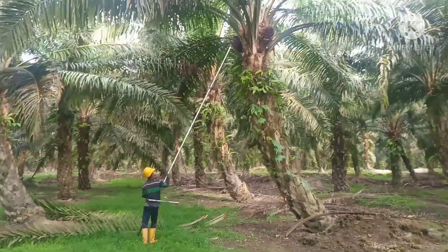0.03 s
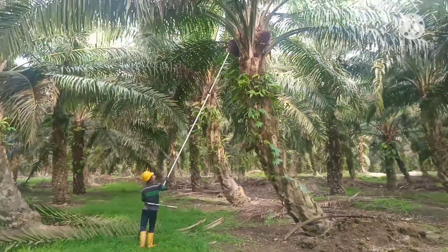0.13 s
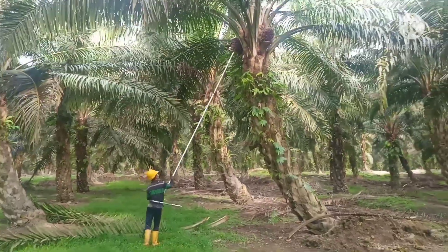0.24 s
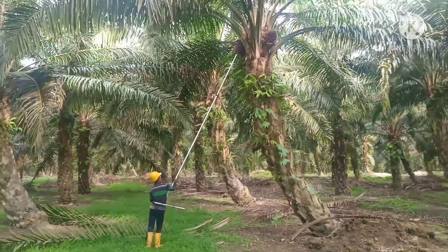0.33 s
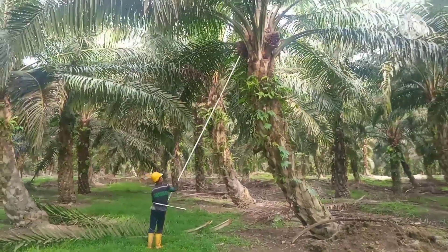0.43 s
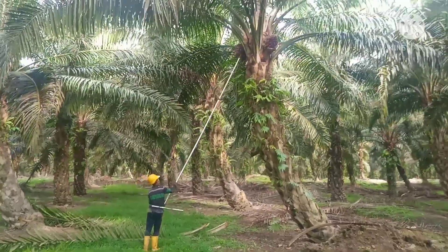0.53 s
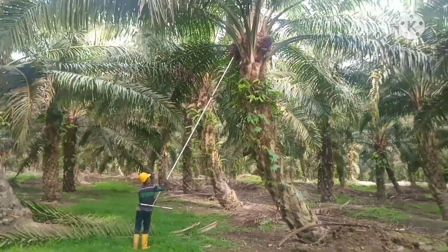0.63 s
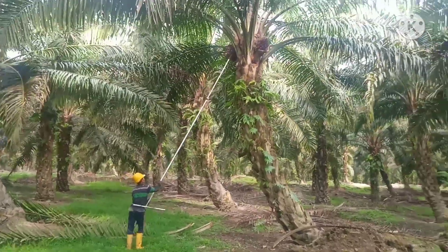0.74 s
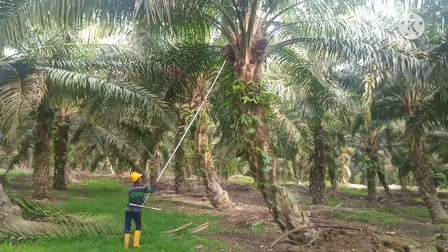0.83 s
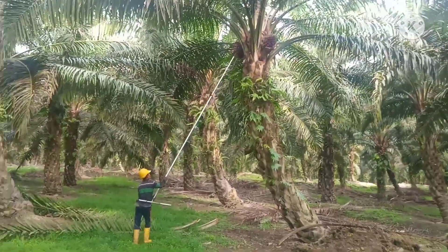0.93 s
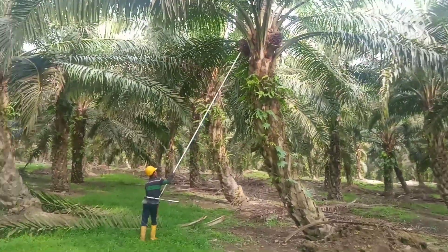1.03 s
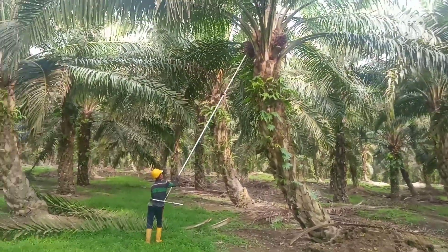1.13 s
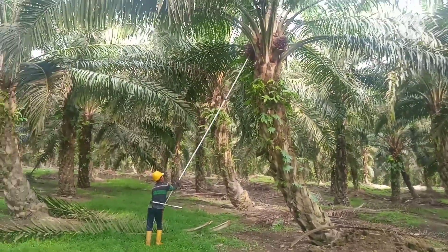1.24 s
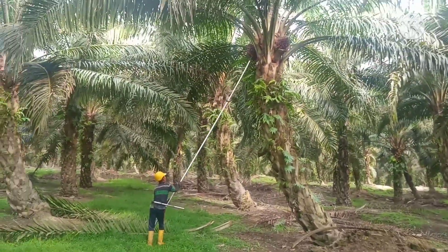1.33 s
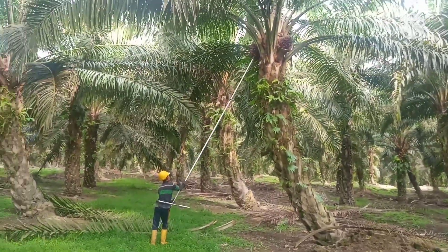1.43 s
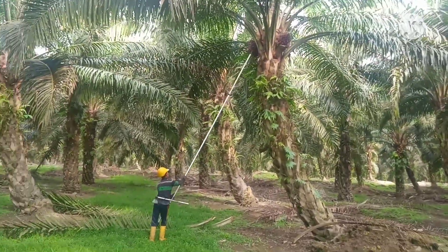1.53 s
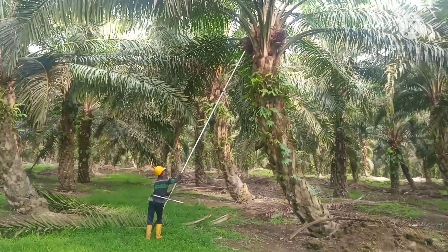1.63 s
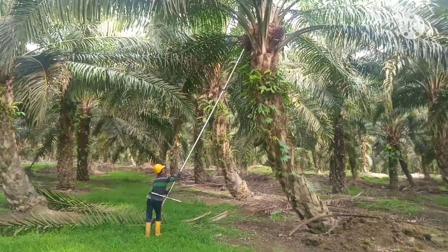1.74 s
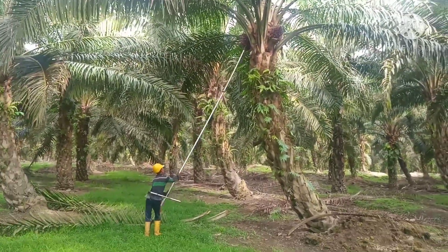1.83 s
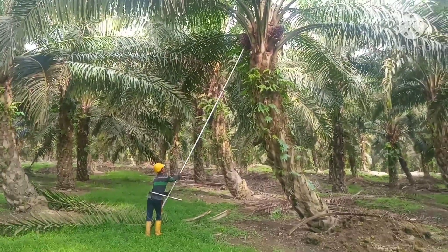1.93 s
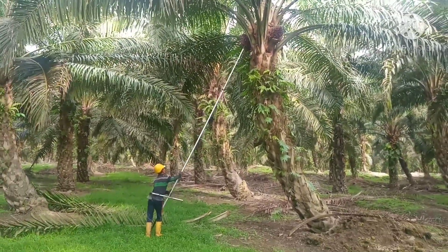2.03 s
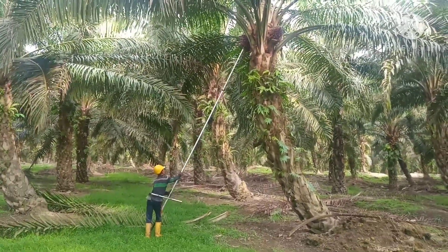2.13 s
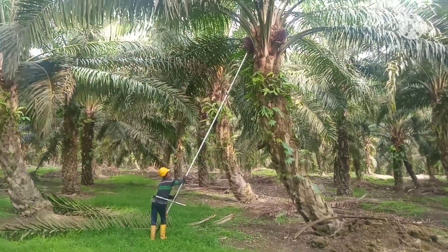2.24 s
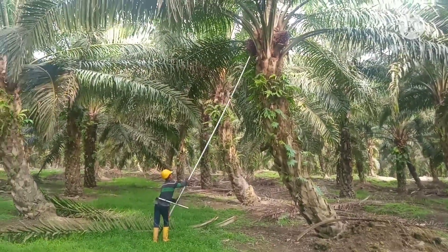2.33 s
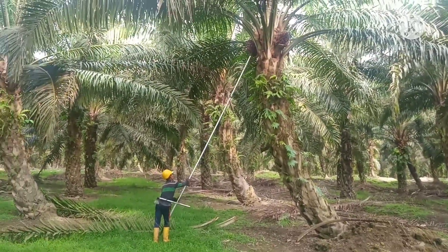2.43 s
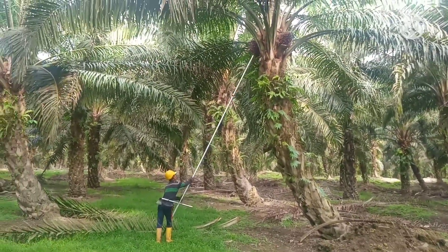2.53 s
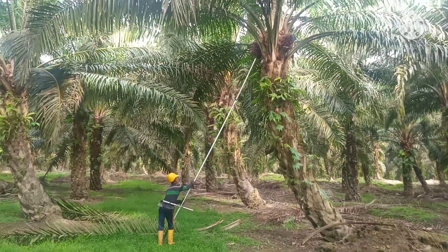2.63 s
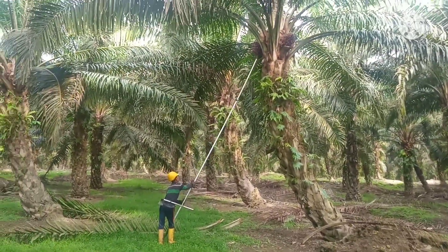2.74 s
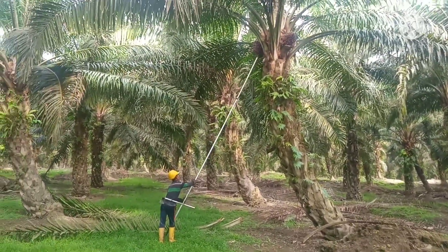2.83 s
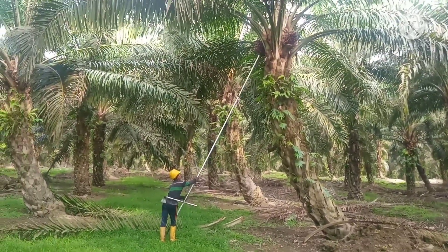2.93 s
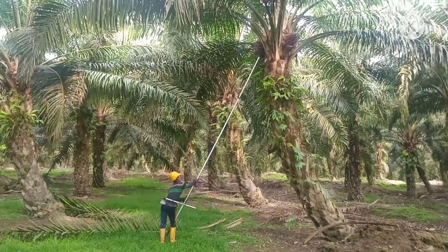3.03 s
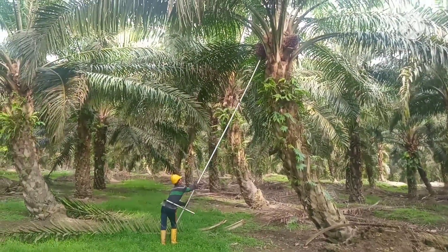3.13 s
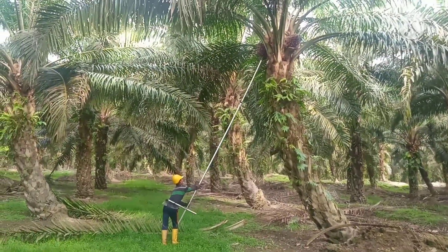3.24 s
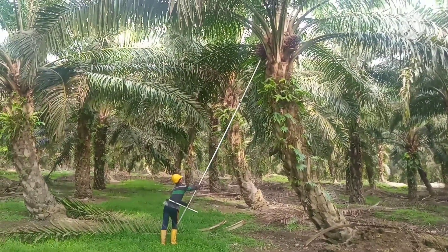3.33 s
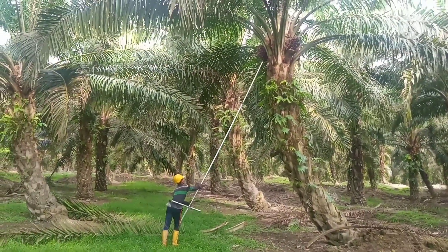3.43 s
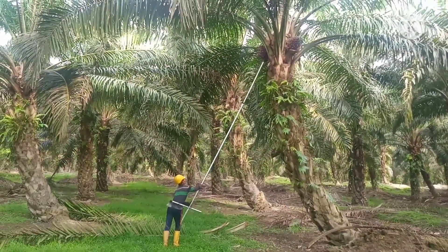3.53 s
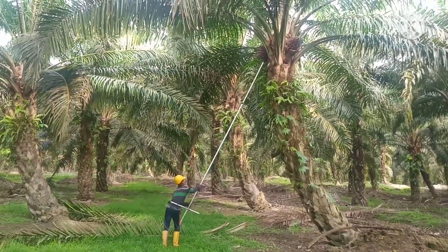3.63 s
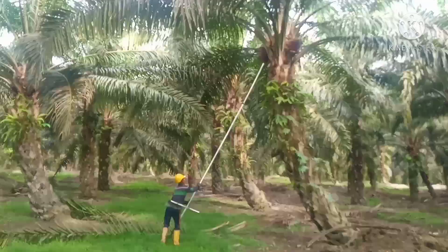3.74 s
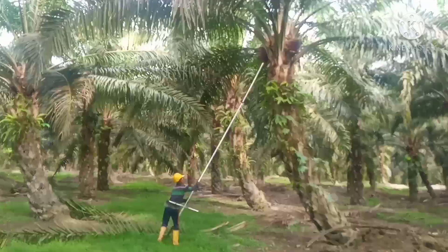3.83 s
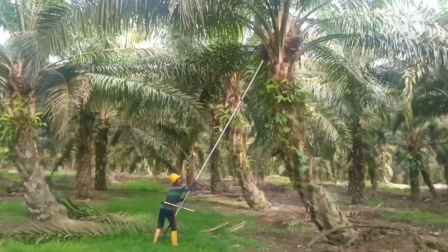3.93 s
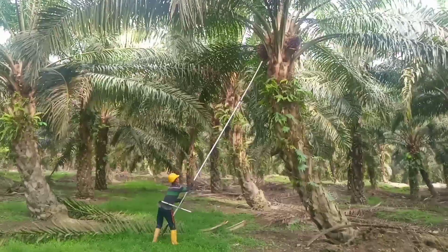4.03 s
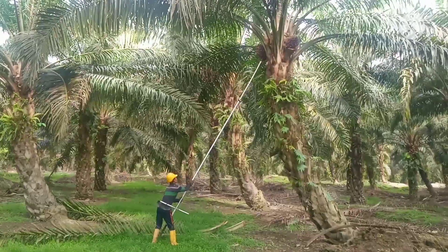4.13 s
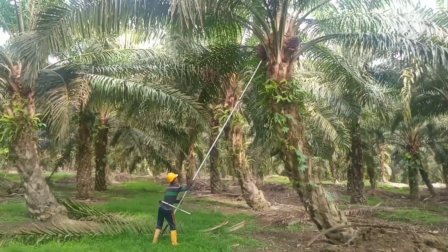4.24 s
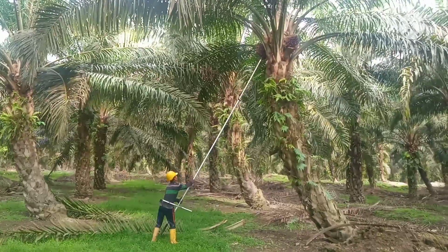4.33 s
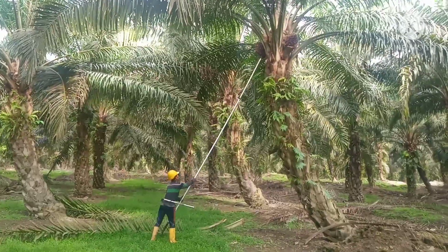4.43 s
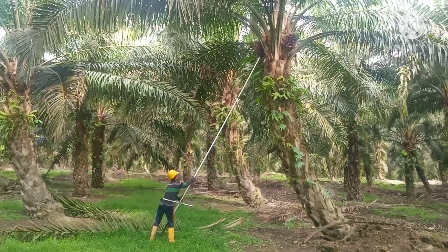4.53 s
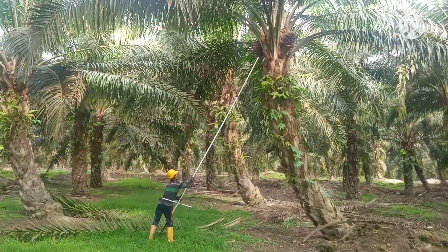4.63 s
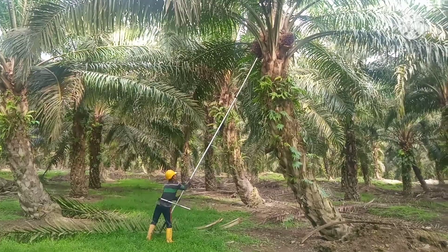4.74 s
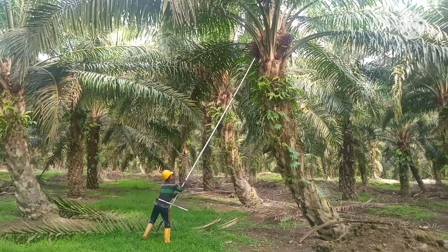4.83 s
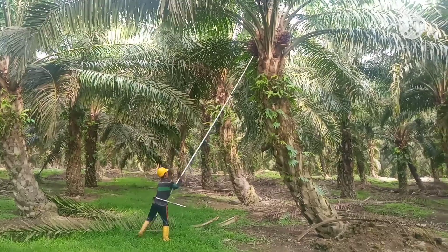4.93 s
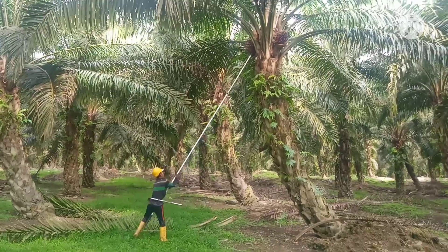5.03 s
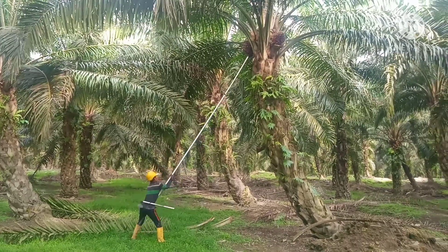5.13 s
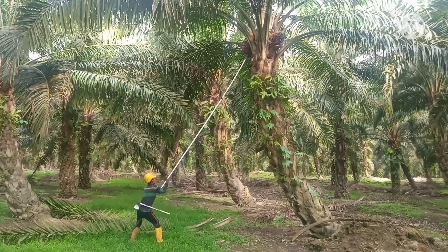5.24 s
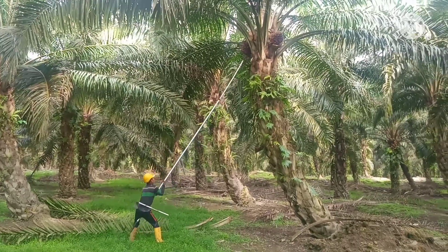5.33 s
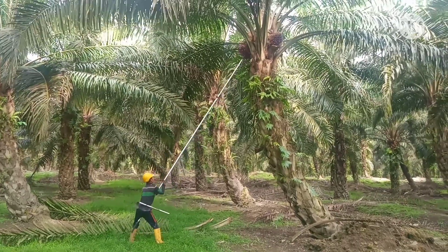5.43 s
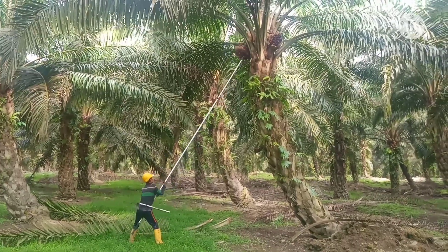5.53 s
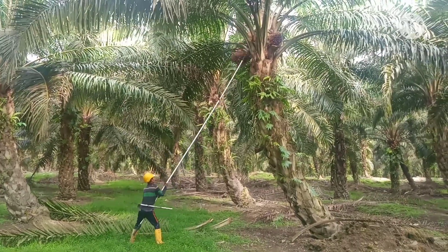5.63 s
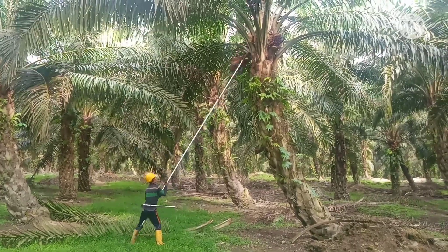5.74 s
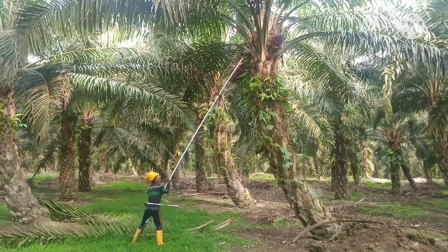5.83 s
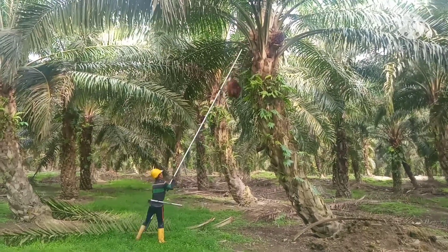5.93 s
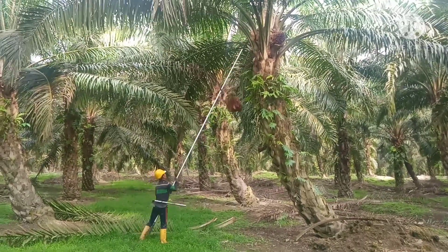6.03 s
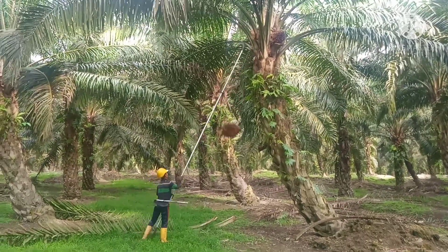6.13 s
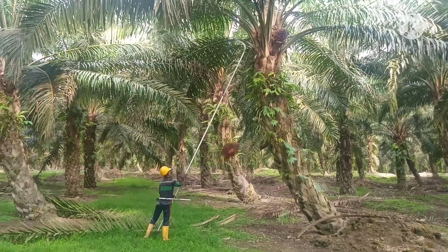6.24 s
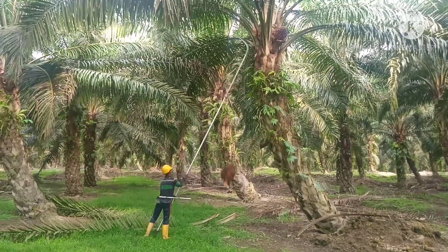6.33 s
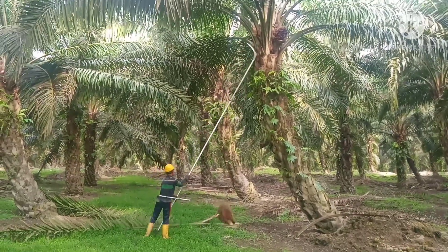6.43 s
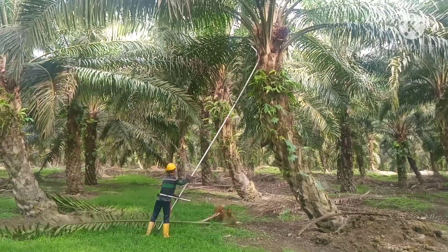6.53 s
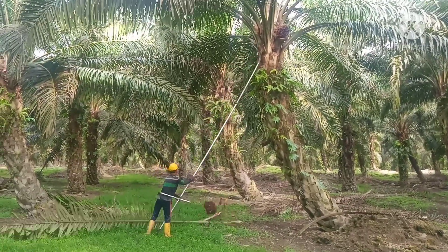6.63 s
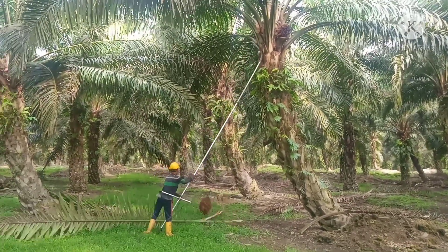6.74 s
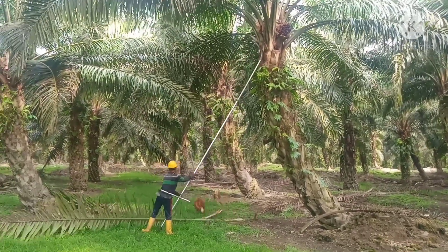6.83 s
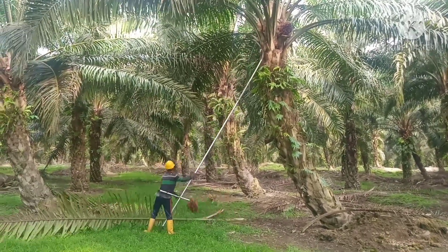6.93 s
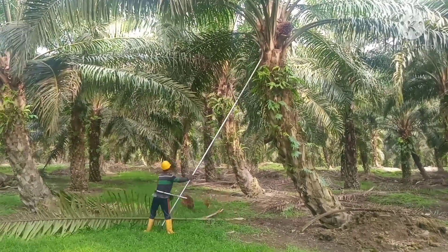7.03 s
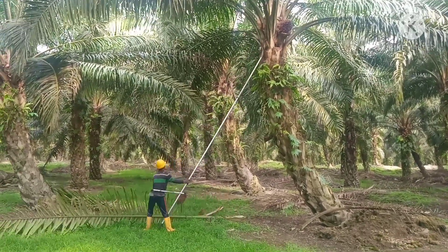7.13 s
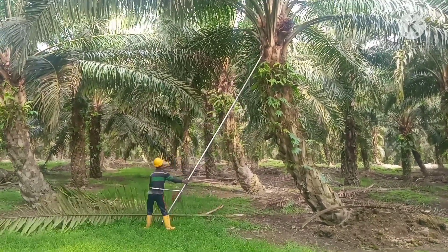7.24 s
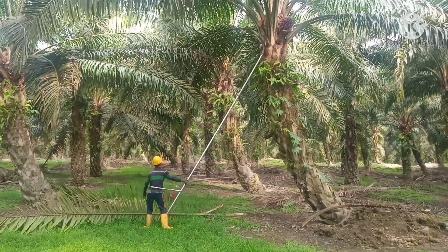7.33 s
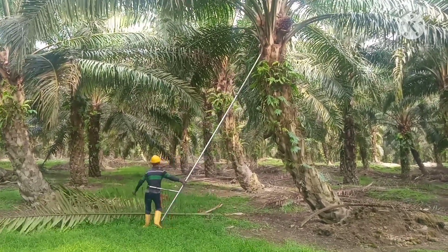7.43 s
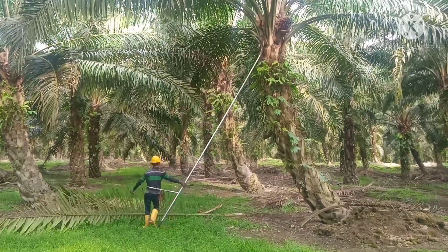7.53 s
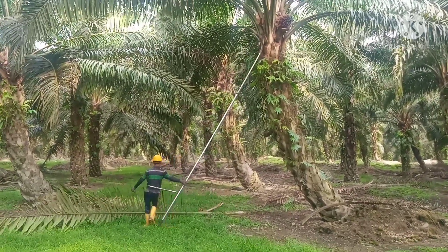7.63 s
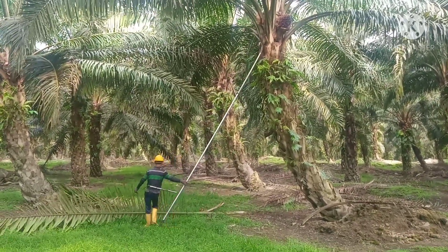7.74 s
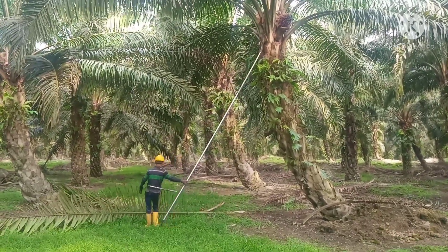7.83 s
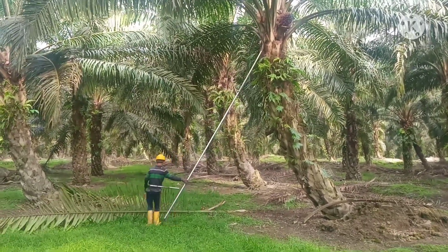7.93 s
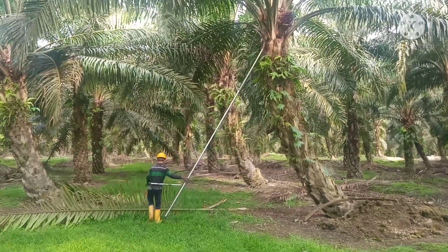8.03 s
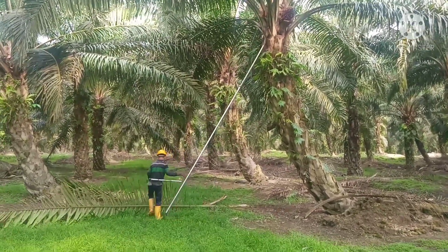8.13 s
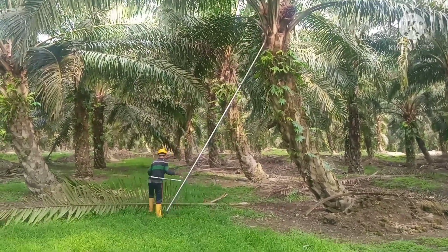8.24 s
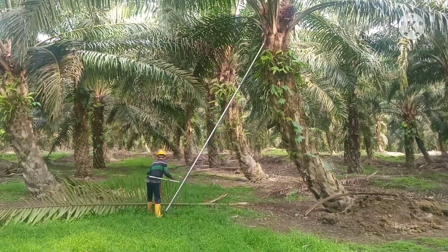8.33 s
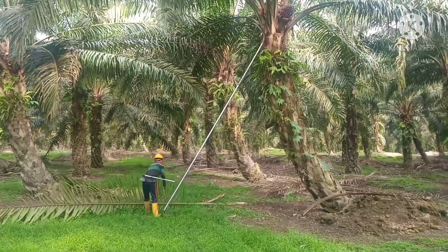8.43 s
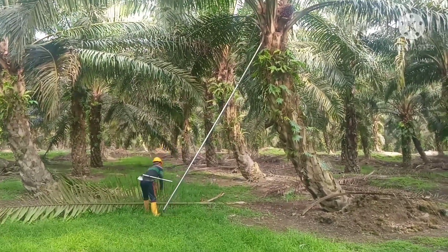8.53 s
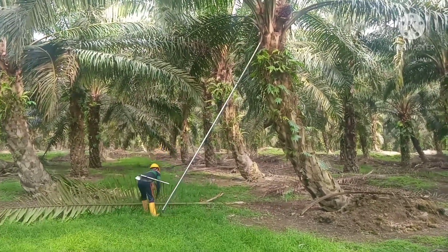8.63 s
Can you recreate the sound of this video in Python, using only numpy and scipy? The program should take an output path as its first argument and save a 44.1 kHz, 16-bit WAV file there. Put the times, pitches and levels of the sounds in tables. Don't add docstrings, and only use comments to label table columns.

```python
import sys
import numpy as np
from scipy import signal
from scipy.fft import rfft
from scipy.io import wavfile
from scipy.ndimage import uniform_filter1d

SR = 44100
rng = np.random.default_rng(int(sys.argv[2]) if len(sys.argv) > 2 else 0)


def convert_level_to_amplitude(level_db):
    exponent = np.asarray(level_db, float) / 20
    return 10 ** exponent


def output_pcm(signal):
    pcm = np.clip(np.atleast_2d(signal).T, -1, 1) * 32767
    wavfile.write(sys.argv[1], SR, np.round(pcm).astype(np.int16))


N = 383669
TIME = np.arange(N) / SR


def level(x, db):
    return x * convert_level_to_amplitude(db) / np.sqrt(np.mean(x ** 2))


def band(x, hz, width):
    return signal.lfilter(*signal.iirpeak(hz, hz / width, SR), x)


def dull(x, low_hz, high_hz):
    return signal.sosfilt(signal.butter(2, [low_hz, high_hz], "band", fs=SR, output="sos"), x)


def modes(x, table):
    return sum((-1) ** k * convert_level_to_amplitude(db) * band(x, hz, width) for k, (hz, width, db) in enumerate(table))


def walk(rate):
    hold = int(SR / rate)
    steps = np.repeat(rng.standard_normal(N // hold + 1), hold)
    return 1.37 * uniform_filter1d(uniform_filter1d(steps, hold), hold)[:N]


def patchy(x, table, patchy_db):
    return sum(convert_level_to_amplitude(patchy_db * walk(35)) * modes(x, [mode]) * (-1) ** k for k, mode in enumerate(table))


def add(out, s, sound):
    i = int(s * SR)
    out[i:i + len(sound)] += sound[:N - i]


def swell(s, build, fade, db):
    onset_db, fade_db = -14, -22
    fades = np.clip((TIME - s - build) / fade, 0, 4)
    rise = np.clip(1 - (TIME - s) / build, 0, 1)
    return (TIME >= s) * convert_level_to_amplitude(db + onset_db * rise + fade_db * fades), fades


# centre in Hz, width in Hz, time to fade by 60 dB in seconds, level in dB.
GROVE_ECHOES = [
    (306, 260, 0.082, 11.5),
    (1300, 2200, 0.34, -2),
    (3150, 2550, 0.96, 3),
    (4450, 2800, 0.54, -6),
    (8300, 4000, 0.92, 5.5),
]


def grove(x, wet_db):
    t = TIME[:SR]
    leaves = 0.69 * np.exp(-t / 0.038) + 1.0 * np.exp(-t / 0.31)
    trunks = 0.32 * np.exp(-((t - .1) / 0.093) ** 2)
    scatter = rng.standard_normal(SR) * convert_level_to_amplitude(1.0 * walk(75.7)[:SR])
    scatter = scatter * (1 + leaves + trunks) * np.clip(t / 0.0028, 0, 1)
    tail = sum(convert_level_to_amplitude(db - 60 * t / t60) * band(scatter, hz, width) for hz, width, t60, db in GROVE_ECHOES)
    middle = np.sqrt(np.mean(np.abs(rfft(tail)[2000:4000]) ** 2))
    return x + convert_level_to_amplitude(wet_db) * signal.fftconvolve(x, tail / middle)[:N]


def bursts(hits, decay_s):
    out, t = np.zeros(N), TIME[:1300]
    for s, db in hits:
        add(out, s, convert_level_to_amplitude(db) * rng.standard_normal(len(t)) * np.exp(-t / decay_s) * np.clip(t / 0.0006, 0, 1))
    return out


def rings(hits, length, attack_s):
    out, t = np.zeros(N), TIME[:length]
    for s, db, hz, ring in hits:
        add(out, s, convert_level_to_amplitude(db - 60 * t / ring) * np.clip(t / attack_s, 0, 1) * np.sin(2 * np.pi * hz * t))
    return out


def crackle(strokes, body, middle, top_db, spread_db, clump_db, lingers_db):
    force, boom = np.zeros((2, N))
    for *stroke, body_db in strokes:
        gain, fades = swell(*stroke)
        force += gain
        boom += gain * convert_level_to_amplitude(body_db + lingers_db * fades)
    force, boom = uniform_filter1d(np.array([force, boom]), size=400) * convert_level_to_amplitude(clump_db * walk(140))

    def grains():
        sizes = np.minimum(rng.exponential(size=N), 4.5)
        return rng.standard_normal(N) * convert_level_to_amplitude(spread_db * sizes + 1.2 * walk(60))

    low, mid, high = grains(), grains(), grains()
    low = dull(patchy(low, body, patchy_db=3.0), 110, 1200)
    mid = dull(patchy(mid, middle, patchy_db=1.5), 500, 4300)
    fibres = band(high, 3800, 2800) + convert_level_to_amplitude(6.5) * band(high, 6100, 1700) + convert_level_to_amplitude(-26.0) * high
    top = dull(fibres, 3700, 14000)
    return boom * level(low, -3.5) + force * (level(mid, 1.84) + level(top, top_db))


# pitch in Hz, level in dB per Hz.
AIR_TONE = [(65, -37), (110, 0.5), (188, -1.5), (531, -23), (754, -9), (947, -21.5), (1800, -4), (2120, 0),
            (2960, 0.5), (3420, -2.5), (5620, -48), (8500, -49), (10200, -32.5), (15500, -43.5)]
# centre in Hz, width in Hz, level in dB.
INSECTS = [
    (8520, 1000, -78.5),
    (7170, 320, -87),
]


def air():
    out, (hz_at, db_at) = 0, np.transpose(AIR_TONE)
    slow = walk(0.29)
    for hz in 120 * 2 ** np.arange(0, 7.1, .4):
        flicker = (0.5 * slow + 5.3 * walk(7.7)) * (100 / hz) ** 0.7
        db = np.interp(np.log(hz), np.log(hz_at), db_at) + flicker
        noise = rng.standard_normal(N)
        for _ in range(3):
            noise = band(noise, hz, hz / 2)
        out = out + convert_level_to_amplitude(db) * noise
    insects = sum(level(band(band(rng.standard_normal(N), hz, w), hz, w), db) for hz, w, db in INSECTS)
    return level(out, -63) + insects * convert_level_to_amplitude(0.57 * walk(4.7)) + convert_level_to_amplitude(-92.5) * rng.standard_normal(N)


# start in seconds, build-up in seconds, fade in seconds, peak in dB.
PUFFS = [(.001, .011, 0.47, -66), (0.612, 0.065, 0.35, -63.5), (1.0, 0.45, 0.064, -63.5),
         (2.101, 0.47, 0.5, -69.5), (3.2, 0.35, 0.087, -84), (3.8, 0.18, 0.064, -67),
         (4.19, 0.057, 0.28, -62), (4.55, 0.25, 0.99, -68.5), (5.12, 0.12, 0.14, -58),
         (5.6, 0.54, 0.5, -70), (6.34, 0.032, 0.37, -45.5), (6.801, 0.11, 0.2, -58),
         (7.67, 0.04, 0.26, -60), (8.17, 0.12, 0.76, -69)]


def breeze():
    rumble = dull(dull(rng.standard_normal(N), 61.4, 150), 28, 170) * convert_level_to_amplitude(2.5 * walk(13))
    calm_db = -74.5
    return level(rumble, -1.4) * (convert_level_to_amplitude(calm_db) + sum(swell(*puff)[0] for puff in PUFFS))


# start in seconds, build-up in seconds, fade in seconds, peak in dB, stalk body in dB.
STROKES = [(0.001, 0.0014, 0.07, -46, -12), (.228, 0.012, 0.052, -46, -25.5),
           (.695, 0.0097, 0.088, -48, -21.5), (.94, 0.0053, 0.11, -52, -0.5),
           (1.145, 0.053, 0.11, -45, -7.5), (1.474, 0.0032, 0.094, -44, -1.5),
           (1.678, 0.065, 0.078, -44, -7), (1.934, 0.036, 0.18, -52.5, -5.5),
           (2.155, 0.081, 0.055, -45, -11), (2.375, 0.0056, 0.15, -51.5, 0), (2.57, 0.051, 0.059, -46, -16),
           (2.635, .02, .055, -50, 1), (2.812, 0.014, 0.053, -58, -0.5), (3.004, 0.019, 0.056, -43, -15.5),
           (3.284, 0.007, 0.085, -58.5, -4), (3.57, 0.027, 0.11, -54, -1.5),
           (3.9, 0.056, 0.068, -41.5, 0.5), (4.095, 0.023, 0.054, -54.5, -1), (4.362, 0.01, 0.074, -37, -6),
           (5.083, 0.12, 0.073, -32, 0.8), (5.225, 0.024, 0.034, -37.5, 5.5),
           (5.731, 0.0036, 0.044, -41.5, -1), (6.002, 0.0046, 0.014, -55, -32),
           (0.042, 0.078, 0.19, -47.5, -7.5), (0.31, 0.024, 1, -54, -17), (2.7, 0.029, 0.15, -49.5, -6.5),
           (4.6, 0.0085, 0.36, -60.5, -18.5), (4.75, 0.02, 0.1, -62, -19), (4.8, 0.063, 0.4, -62, -4.5),
           (5.26, 0.012, 0.38, -60, -10), (5.602, 0.0025, 0.91, -50, -20.5),
           (7.385, 0.015, 0.052, -57.5, -16), (5.5, 0.011, 0.12, -53.5, -6), (1.95, .004, 0.076, -50, -3.5),
           (2.186, .003, 0.059, -48, -15), (3.03, 0.034, 0.069, -50.5, 2.5),
           (3.33, 0.015, 0.099, -67.5, 1.5), (1.934, 0.0028, 0.02, -53.5, -7), (2, 0.02, 0.04, -66, -4)]
# pitch in Hz, width in Hz, level in dB.
STALK = [(224, 79, 2), (306, 161, 2), (374, 47, -1), (443, 72, -5)]
# pitch in Hz, width in Hz, level in dB.
BLADE = [(806, 152, -6), (1034, 170, -3.5), (1385, 268, -4.5), (2080, 322, -1), (3240, 1360, -7)]


def sawing():
    return crackle(STROKES, STALK, BLADE, top_db=-27.5, spread_db=4.0, clump_db=2.0, lingers_db=6.5)


# start in seconds, middle range in dB.
TAPS = [(.0094, -52), (.0444, -51), (.2344, -33), (.3248, -27.5), (.7047, -37), (0.9464, -30.5),
        (1.5279, -51), (1.7483, -51), (2.0368, -29.5), (2.146, -29.5), (2.2194, -46), (2.655, -43),
        (3.0106, -39.5), (3.028, -40), (4.1073, -34), (4.6545, -51), (5.0895, -40), (5.7305, -55.5),
        (6.011, -39), (6.3107, -33), (6.3485, -26.5), (6.3735, -30.5), (6.7994, -35.5), (6.8944, -37),
        (6.9685, -40), (7.3694, -52), (8.1397, -53)]


def taps():
    ring = modes(bursts(TAPS, decay_s=.0055), BLADE)
    return convert_level_to_amplitude(5.0) * dull(dull(ring, 600, 2300), 450, 2600)


# start in seconds, peak in dB, pitch in Hz, ring in seconds.
CLINKS = [(5.925, -62.5, 1200, .08), (6.006, -36, 1350, .04), (7.35, -47.5, 706, 0.077),
          (7.005, -52.5, 680, .06), (5.5, -56, 730, .06), (6.2, -46.5, 990, 0.07),
          (3.285, -48.5, 1200, 0.072), (1.432, -50, 1350, 0.04), (.236, -47, 800, .07),
          (.322, -45, 800, .05), (.055, -48, 800, .05), (2.6, -45, 252, 0.13), (5.74, -33.5, 288, 0.07),
          (6.795, -48, 820, .06), (6.932, -44, 806, 0.048), (6.968, -43, 1000, 0.045)]


def clinks():
    return grove(rings(CLINKS, SR // 4, attack_s=.004), -1.0)


# start in seconds, middle range in dB, treble in dB.
SNAPS = [(0.1249, -23.5, -30), (0.7669, -32, -37), (1.1532, -33, -49), (1.197, -53, -40.5),
         (1.4352, -37.5, -47), (1.475, -52, -44), (1.68, -31, -46), (1.6871, -35, -40), (1.937, -44, -46),
         (1.9756, -39, -38), (2.184, -55, -34), (2.201, -20.5, -39), (2.299, -49, -43), (2.383, -20.5, -42),
         (2.592, -34, -42.5), (2.823, -45, -43), (3.0779, -31.5, -36.5), (3.576, -47, -52),
         (3.9075, -49, -44), (3.931, -39, -57), (4.282, -32, -48), (4.368, -27, -35.5), (4.97, -47, -59),
         (5.2061, -8.5, -24.5), (5.6086, -29, -42), (6.394, -12.5, -18.5), (6.416, -14.5, -17),
         (8.237, -41, -46), (.44, -54, -66.5), (4.4094, -58, -57), (5.6237, -45, -52), (3.605, -52, -51),
         (3.64, -55, -57), (3.682, -53, -55), (4.11, -46, -58), (6.3735, -40, -34), (6.355, -38, -32.5),
         (6.93, -47.5, -49)]


def snaps():
    treble = bursts([(s, db) for s, _, db in SNAPS], decay_s=0.0031)
    middle = bursts([(s, db) for s, db, _ in SNAPS], decay_s=0.0031)
    top = dull(band(treble, 8000, 3300), 3500, 6530) + convert_level_to_amplitude(-29) * dull(treble, 10500, 16000)
    return top + convert_level_to_amplitude(6.0) * dull(modes(middle, BLADE), 380, 3800)


# start in seconds, body in dB.
KNOCKS = [(0.1254, -27), (0.443, -34.5), (0.948, -20.5), (1.435, -45), (1.475, -50), (1.5271, -26.5),
          (2.198, -37), (2.383, -63), (2.823, -44), (3.076, -46), (3.906, -54), (3.931, -28), (4.109, -36),
          (4.367, -42), (4.4108, -29.5), (5.0913, -37), (5.2061, -17), (5.7305, -65), (6.31, -41),
          (6.3479, -19), (6.3723, -28), (6.3934, -22), (6.893, -29)]


def knocks():
    return convert_level_to_amplitude(9.0) * dull(modes(bursts(KNOCKS, decay_s=0.0034), STALK), 130, 1100)


# start in seconds, peak in dB, pitch in Hz, ring in seconds.
CRACKS = [(.126, -41, 1894, 0.046), (0.7042, -38, 1455, 0.038), (1.975, -37, 1300, 0.022),
          (2.222, -39, 2110, 0.045), (2.383, -30, 2100, 0.029), (2.61, -43, 1360, 0.043),
          (1.68, -41, 2150, 0.055), (1.745, -44, 2144, .05), (1.749, -38, 996, .04),
          (3.045, -42, 2160, 0.16), (3.288, -54, 290, 0.12), (8.135, -51, 854, 0.055),
          (8.237, -55, 854, 0.036), (3.015, -37, 2145, 0.049), (3.285, -41, 2225, 0.052),
          (4.652, -46, 1380, 0.041), (5.115, -32, 800, 0.046), (5.136, -32, 900, 0.045),
          (5.167, -30, 873, 0.1), (5.18, -32, 900, 0.045), (5.203, -22, 1950, .025),
          (5.2065, -19.5, 2200, 0.022), (5.203, -24, 900, 0.036), (5.207, -21.5, 252, 0.074),
          (5.222, -25, 303, 0.034), (5.244, -25, 824, 0.037), (5.606, -37, 2145, .05),
          (5.734, -31, 1200, 0.041), (5.736, -31.5, 2115, 0.033), (5.733, -27.5, 3440, 0.022),
          (6.3495, -5.5, 1954, 0.0074), (6.3484, -22.5, 1126, 0.026), (6.356, -24, 1000, 0.03),
          (6.404, -24.5, 541, 0.045), (6.3855, -13, 260, .045), (6.395, -23, 791, 0.032),
          (6.3985, -14, 1500, 0.007), (6.437, -25, 260, 0.06), (6.4, -24, 254, .08),
          (6.856, -47, 1300, 0.028), (6.89, -41, 3300, .04), (6.409, -20.5, 783, 0.035),
          (6.417, -18, 2630, 0.032), (6.426, -22, 850, 0.025), (6.467, -26, 2905, 0.044),
          (6.524, -22, 2700, 0.022), (8.69, -43, 3050, 0.018)]


def cracks():
    return dull(rings(CRACKS, SR // 10, attack_s=0.001) * convert_level_to_amplitude(2.6 * walk(400)), 150, 9000)


def whistle(length, start_hz, top_hz, end_hz, db, turn, loudest=0.55, swell_db=0, onset=2.6, curl=1.5,
            attack=.0021, push_db=0, release=0.00052):
    u = np.arange(int(length * SR)) / (length * SR)
    up = top_hz - (top_hz - start_hz) * np.clip(1 - u / turn, 0, 1) ** onset
    down = (top_hz - end_hz) * np.clip((u - turn) / (1.001 - turn), 0, 1) ** curl
    edges = np.clip(u * length / attack, 0, 1) * np.clip((1 - u) * length / release, 0, 1)
    main_push = swell_db * np.exp(-((u - loudest) / 0.18) ** 2)
    early_push = push_db * np.exp(-((u - .14) / 0.11) ** 2)
    return convert_level_to_amplitude(db + main_push + early_push) * edges * np.sin(2 * np.pi * np.cumsum(up - down) / SR)


def glide(length, start_hz, end_hz, db, turn=.95, **shape):
    return whistle(length, start_hz, end_hz, end_hz, db, turn=turn, **shape)


def voice(x):
    x = x * convert_level_to_amplitude(1.9 * walk(150))
    return 1.034 * x + 0.96 * band(x, 3010, 900)


# start in seconds, start pitch in Hz, end pitch in Hz, level in dB.
FALLS = [(.207, 4540, 4170, -44), (1.12, 4930, 4110, -43), (2.335, 4900, 4745, -45.5),
         (3.747, 4820, 3870, -43), (4.766, 4810, 4580, -42), (5.892, 4790, 4400, -45),
         (7.071, 4450, 3930, -42), (8.02, 4496, 4080, -46), (8.668, 4450, 4500, -55)]
# start in seconds, level in dB.
CHIPS = [(0.806, -46), (2.04, -47.5), (3.368, -44), (4.545, -48.5), (6.211, -48), (7.494, -47),
         (8.578, -47)]
# length in seconds, start pitch in Hz, end pitch in Hz.
CHIP = (.013, 2750, 3200)
# start in seconds, length in seconds, top pitch in Hz, level in dB, tick in dB.
ARCH_SONGS = [(0.845, 0.12, 3548, -44, -55.5), (2.082, 0.14, 3443, -46.5, -55),
              (3.41, 0.12, 3503, -44.5, -60), (4.583, 0.14, 3485, -45.5, -56), (6.253, .12, 3486, -43, -61),
              (7.534, 0.15, 3493, -46, -55), (8.616, 0.13, 3393, -51, -57)]


def near_bird():
    out = np.zeros(N)
    for s, *note in FALLS:
        add(out, s, glide(.017, *note, turn=1.4))
    for s, db in CHIPS:
        add(out, s, glide(*CHIP, db, turn=0.87, attack=0.003))
    for s, length, top_hz, db, _ in ARCH_SONGS:
        add(out, s, whistle(length, 1300, top_hz, 1758, db, turn=.36, loudest=0.63, swell_db=7.0, onset=3.1,
                            curl=1.7, release=.012, attack=0.0091, push_db=1.5))
    return voice(out)


# start in seconds, length in seconds, top pitch in Hz, level in dB.
RISES = [(0.24, 0.026, 3250, -44.5), (1.152, 0.0212, 3066, -44), (2.377, 0.025, 3220, -42.5),
         (3.783, 0.025, 3200, -43.5), (4.796, 0.025, 3340, -45), (5.929, .018, 3320, -44),
         (7.106, 0.025, 3150, -46.5), (8.05, 0.027, 3100, -48)]
# start in seconds, hook delay in seconds, top pitch in Hz, level in dB, grace note in dB.
HOOK_SONGS = [(.234, 0.1, 3950, -46.5, -45), (1.152, .101, 3987, -50, -51.5),
              (2.378, 0.089, 3900, -49, -42), (3.78, 0.102, 3940, -48.5, -44),
              (4.793, 0.11, 3855, -50.5, -44), (5.931, .098, 3908, -50, -45),
              (7.112, 0.098, 3734, -48.5, -50), (8.052, 0.096, 3745, -51, -51)]
# length in seconds, start pitch in Hz, end pitch in Hz.
GRACE = (0.018, 1750, 2500)
# start in seconds, length in seconds, then start, top and end pitch in Hz.
LONE_HOOK = (.51, .135, 2500, 3338, 2100)
# length in seconds, start pitch in Hz, end pitch in Hz.
TICK = (0.009, 5500, 4150)
# start in seconds, length in seconds, start pitch in Hz, end pitch in Hz, level in dB.
STRAYS = [(3.628, .015, 1800, 2300, -59), (3.657, .018, 2100, 3000, -57), (3.678, .035, 2900, 4400, -62),
          (4.498, .018, 3000, 3060, -58), (4.528, .012, 3050, 3100, -59), (4.78, .012, 4500, 3900, -58),
          (4.903, .025, 2100, 2950, -47.5), (8.5, .02, 3250, 3260, -61), (8.522, .04, 2000, 3450, -58),
          (8.64, .03, 4500, 4510, -64)]
# start in seconds, length in seconds, start pitch in Hz, end pitch in Hz, level in dB.
FAR = [
    (2.84, .15, 2450, 3050, -66),
    (3.1, .24, 2200, 2750, -68),
]


def deep_birds():
    out = np.zeros(N)
    for s, length, top_hz, db in RISES:
        add(out, s, glide(length, 1800, top_hz, db, turn=0.805, onset=2.785, attack=0.0074))
    for s, hook, top_hz, db, grace_db in HOOK_SONGS:
        add(out, s + hook - .039, glide(*GRACE, grace_db))
        add(out, s + hook, whistle(0.102, 1700, top_hz, 2856, db, turn=.42, loudest=0.79, swell_db=7.5,
                                   onset=2.1, curl=2.2, attack=0.007, push_db=6.5))
    add(out, LONE_HOOK[0], whistle(*LONE_HOOK[1:], db=-55, turn=.62, loudest=.35, swell_db=8))
    for s, _, _, _, tick_db in ARCH_SONGS:
        add(out, s - .066, glide(*TICK, tick_db, turn=1.2))
    for s, *note in STRAYS + FAR:
        add(out, s, glide(*note))
    return voice(out)


# start in seconds, peak in dB, pitch in Hz, ring in seconds.
THUDS = [
    (0.321, -51, 99, 0.1),
    (0.657, -36, 106, 0.051),
    (1.176, -58, 138, 0.12),
    (6.388, -18, 120.5, 0.054),
    (6.853, -23.5, 108, 0.031),
    (7.741, -59.5, 98.2, 0.11),
    (8.252, -42, 152, 0.083),
]


def thuds():
    out, t = np.zeros(N), TIME[:SR // 2]
    for s, db, hz, ring in THUDS:
        swing = np.sin(2 * np.pi * hz * (t + 0.0031 * (1 - np.exp(-t / 0.007))))
        add(out, s, convert_level_to_amplitude(db - 60 * t / ring) * np.clip(t / 0.011, 0, 1) * swing)
    return out


# start in seconds, length in seconds, start pitch in Hz, end pitch in Hz, level in dB.
COOS = [(4.962, .12, 605, 620, -62.5), (5.44, .15, 570, 750, -66), (5.63, 0.12, 600, 600, -65.5),
        (7.82, 0.11, 640, 680, -77), (8.4, .1, 730, 700, -69.5), (8.62, 0.033, 620, 610, -80),
        (6.255, .05, 700, 600, -70), (4.86, 0.059, 420, 430, -77), (4.46, .05, 700, 710, -69),
        (4.54, 0.085, 720, 690, -69.5), (7.92, .06, 800, 690, -73), (3.17, .05, 710, 700, -78)]


def dove():
    out = np.zeros(N)
    for s, *note in COOS:
        add(out, s, glide(*note, turn=0.94, attack=0.012, release=0.018))
    return grove(out * convert_level_to_amplitude(4.0 * walk(40)), wet_db=8.5)


# time in seconds, level in dB.
MATE_VIEW = [
    (0, -1.5),
    (3.5, -5),
    (6, 1.5),
    (7, -7),
    (8, -10),
]


def birds():
    near, deep = near_bird(), deep_birds()
    hidden = deep * (convert_level_to_amplitude(np.interp(TIME, *np.transpose(MATE_VIEW))) - 1)
    duet = grove(convert_level_to_amplitude(-3.5) * near, wet_db=4.5) + grove(convert_level_to_amplitude(-2.5) * deep, wet_db=5.5)
    return duet + convert_level_to_amplitude(-5.0) * hidden + dove()


# start in seconds, build-up in seconds, fade in seconds, peak in dB, body in dB.
CRASH = [(6.348, 0.0051, 0.049, -36, 6.5), (6.355, 0.032, .12, -32.5, 9), (6.4, 0.052, 0.12, -33.5, -26),
         (6.53, 0.0092, 0.82, -51.5, -7.5), (6.845, 0.0076, 0.14, -54.5, 1),
         (6.95, 0.04, 0.32, -63.5, -14.5), (7.1, 0.071, 0.05, -61, -3.5), (7.335, 0.029, 0.082, -53, -11),
         (7.708, 0.041, 0.068, -57.5, 5), (8.105, 0.02, 0.12, -56, -23), (8.21, 0.054, 0.17, -66.5, -9)]
# pitch in Hz, width in Hz, level in dB.
GROUND = [(152, 69, -4), (242, 39, 2), (318, 130, -5), (372, 33, -2.5), (470, 72, -10.5)]
# pitch in Hz, width in Hz, level in dB.
LITTER = [(800, 390, -0.69), (1900, 1400, -0.5), (3440, 1150, 1.6)]


def crash():
    return crackle(CRASH, GROUND, LITTER, top_db=-20.5, spread_db=4.0, clump_db=1.0, lingers_db=-1.5)


def scene():
    work = grove(sawing() + taps() + snaps() + knocks() + cracks(), -7.5)
    landing = grove(crash(), -0.6) + thuds()
    return (air() + breeze() + work + clinks() + birds() + landing)[None]


def roll_off(x):
    return signal.sosfilt(signal.butter(12, 15690, fs=SR, output="sos"), x)


def record(dry):
    mix = dry - .5 * band(dry, 5620, 900.0)
    return roll_off(mix)


dry = scene()
out = record(dry)
output_pcm(out)
```